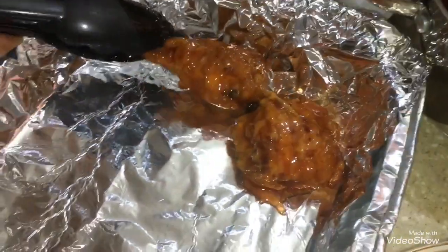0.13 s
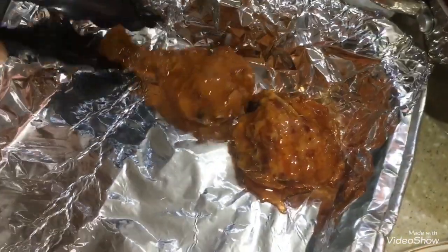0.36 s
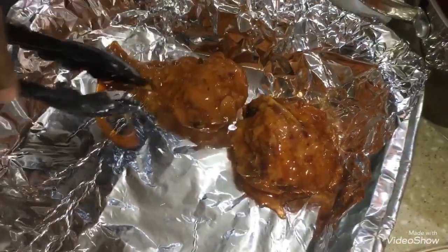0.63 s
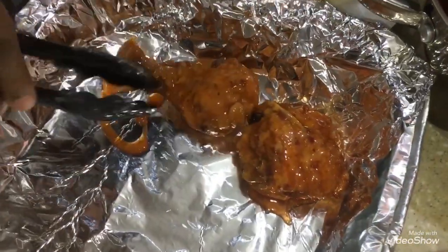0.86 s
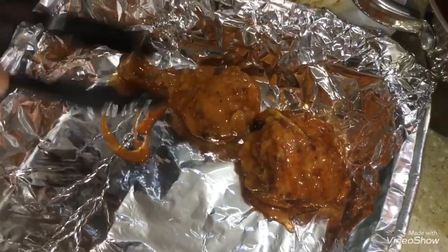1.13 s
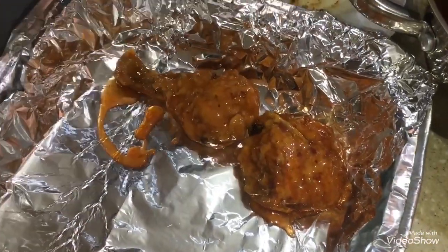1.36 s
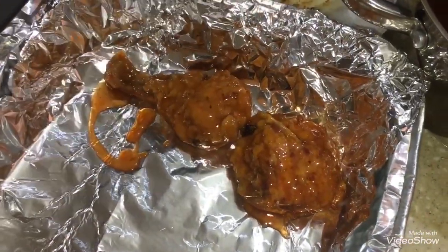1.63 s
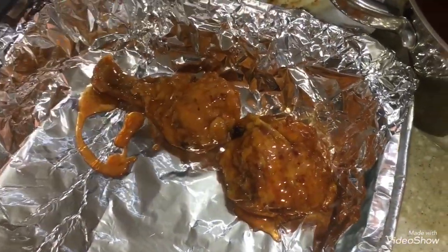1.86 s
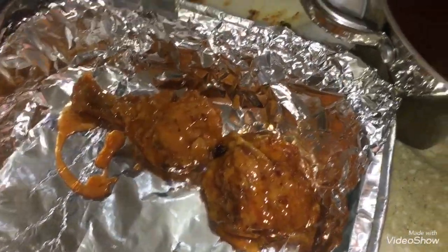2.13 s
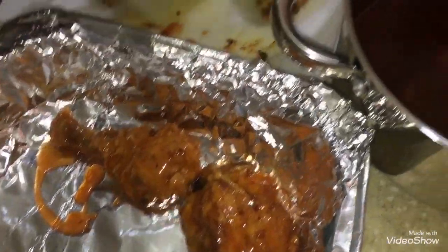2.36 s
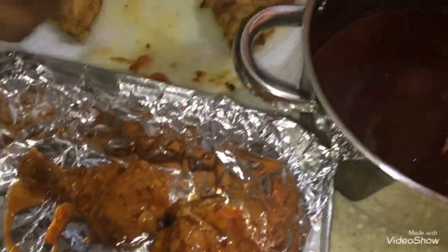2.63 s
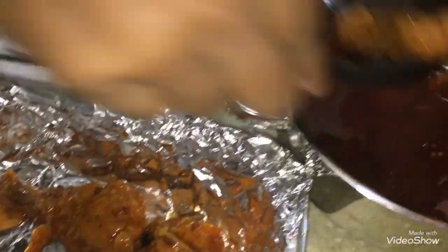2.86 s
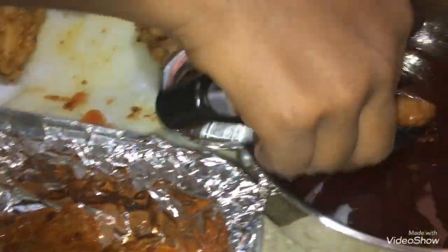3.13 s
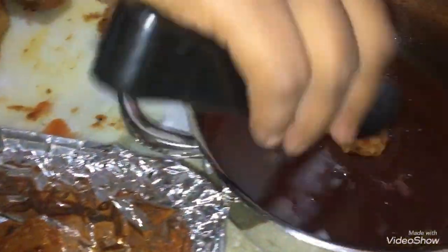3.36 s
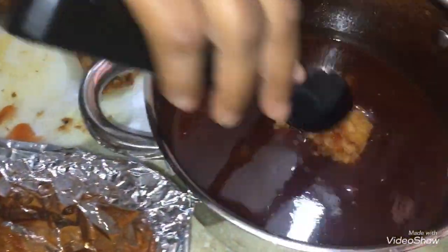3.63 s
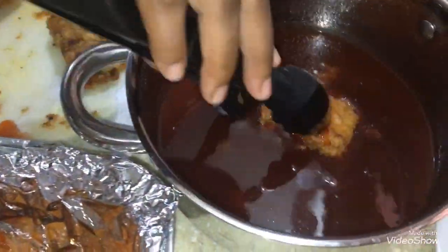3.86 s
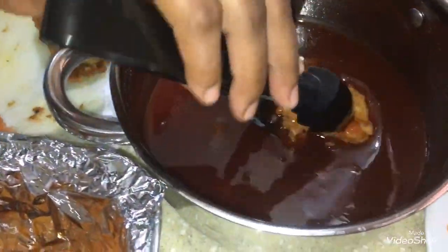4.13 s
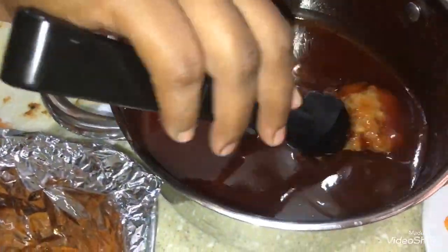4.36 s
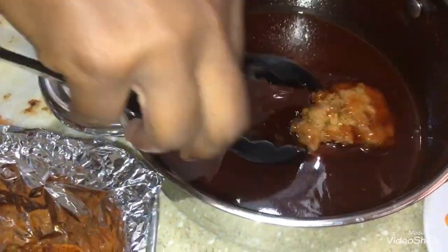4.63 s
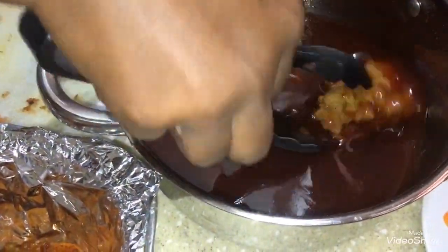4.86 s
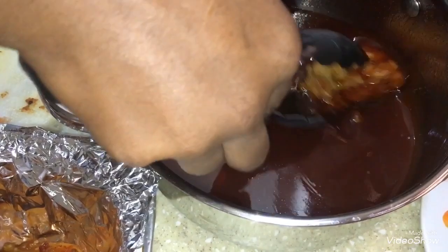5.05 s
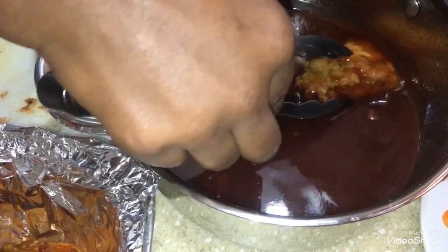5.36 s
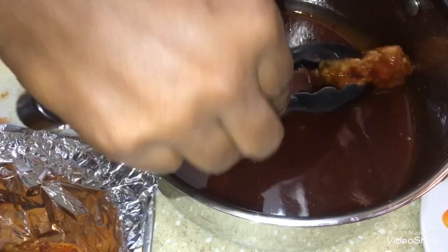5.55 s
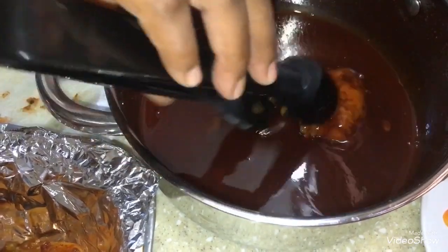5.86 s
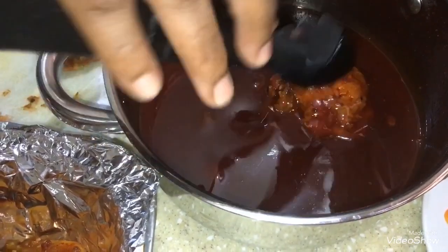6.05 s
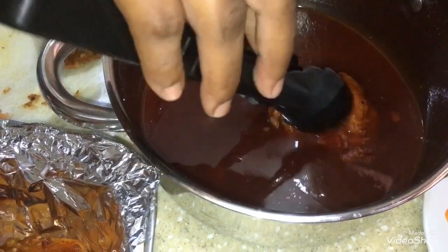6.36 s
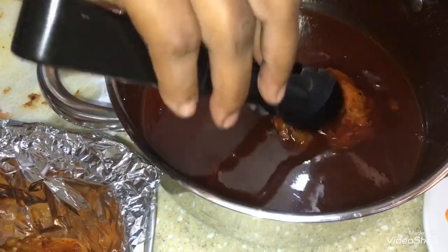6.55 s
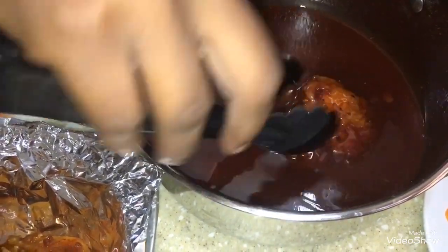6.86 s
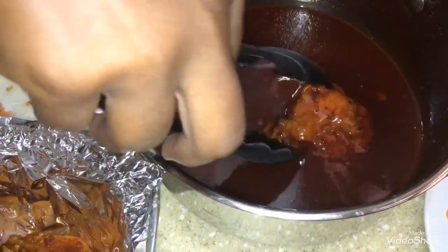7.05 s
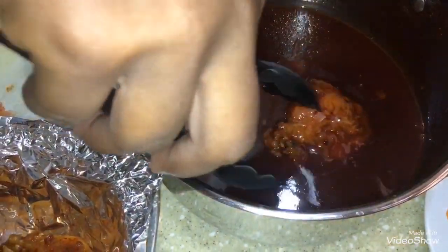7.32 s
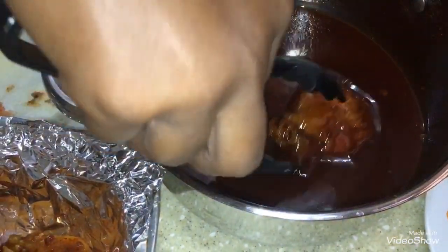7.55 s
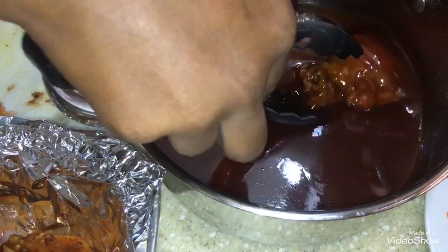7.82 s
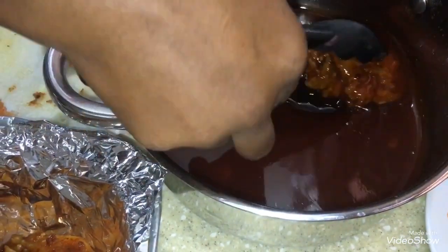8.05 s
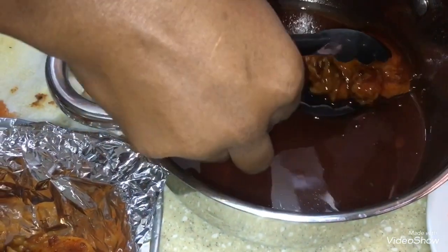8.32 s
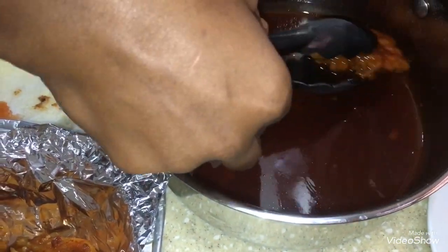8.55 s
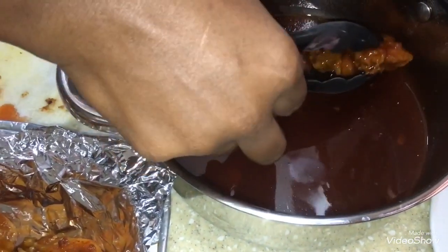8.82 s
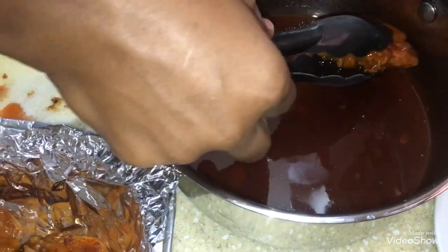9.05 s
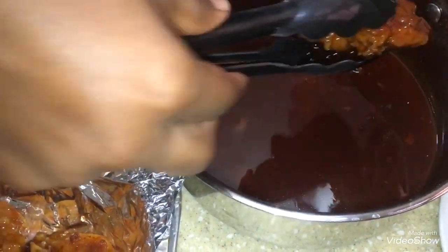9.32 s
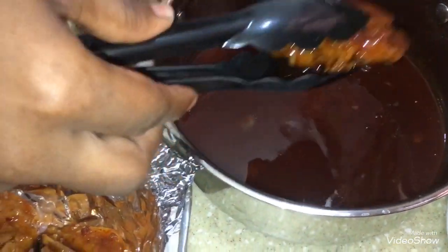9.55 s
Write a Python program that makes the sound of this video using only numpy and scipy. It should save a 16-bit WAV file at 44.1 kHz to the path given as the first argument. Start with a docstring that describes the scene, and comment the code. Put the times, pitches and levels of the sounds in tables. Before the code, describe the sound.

A low, slightly wavering fan rumble with soft air and motor hum runs throughout a small kitchen, heard close to the work. At 0 s foil crinkles brightly; at about 0.2 s chicken and tongs land on the foil-lined tray with a hard clack, followed by dense crackle and a lighter tap until 0.5 s. Crisp snaps return around 0.65-0.8 s, then fade into faint ticks. A gentler crinkle with duller foil pops and soft bumps comes at 1.7-2.25 s. From 3.1 s tongs move in thick sauce: sticky ticks near 3.4, a hollow wet blip at 3.6, rubs and smacks at 4.2-5.8, with tiny squeaks. Plastic knocks the pot most clearly at 6.2 s, with weaker taps to 6.9; the hum swells around 7-8 s. Soft knocks and sticky ticks follow, then the tongs click sharply at 8.8 s. The fan remains, its hum rising again at the end.

```python
"""In a small kitchen with a humming fan, plastic tongs lay sauced chicken on a foil-lined tray, then turn
another piece in a steel pot of sauce. Foil crinkles, tongs knock, rub and squeak, sauce smacks and blips.
Contacts are short noise cracks and decaying rings; foil and sauce are many tiny random slips.
The fan is coloured noise plus wavering motor tones."""
import sys
import numpy as np
from scipy import signal
from scipy.fft import rfft, irfft, next_fast_len
from scipy.io import wavfile

SR = 44100
rng = np.random.default_rng(int(sys.argv[2]) if len(sys.argv) > 2 else 0)


def dump_mix(stems):
    """Bounce the given channels to the path in sys.argv[1] as a 16-bit WAV at rate SR."""
    frames = np.atleast_2d(stems).T  # one column per channel
    limited = np.clip(frames, -1, 1)  # hard clip at full scale
    pcm = np.round(limited * 32767).astype(np.int16)
    wavfile.write(sys.argv[1], SR, pcm)


N = 427329
TIME = np.arange(N) / SR
AGE = TIME[:SR // 4]   # seconds since a contact

# A t60 is the time in which a ring falls by 60 dB. Levels are those before the room is added.

# Fan rumble and fan air: how strong each pitch is. Each row: frequency in Hz, strength in dB per Hz.
FAN_RUMBLE = [(20, -36), (34, -19.5), (48, -3), (64, -0.5), (85, -1.5), (100, 1.5), (118, -5.5), (142, 2.5),
              (175, -1.5), (235, -4.5), (272, -14), (370, -27.5), (600, -64.5)]
FAN_AIR = [(180, -25), (300, -1), (370, -6), (490, -4.5), (590, -3.5), (700, -5), (790, -6.5), (1100, -8.5),
           (1300, -12), (1600, -12), (1900, -16.5), (2200, -22), (3300, -22.5), (5500, -28), (7200, -29),
           (10200, -34), (14500, -40)]
# The fan's housing rings. Each row: frequency in Hz, width in Hz, level in dB before the rumble's sags.
FAN_BANDS = [(63.05, 5.4, -62), (141.2, 12.94, -61.5), (437.8, 11, -81.5), (487, 19, -77.5),
             (682, 60, -81.5), (1071, 54, -80), (3265, 41, -93), (4730, 23, -95), (5940, 50, -93.5),
             (9200, 180, -99)]
# Motor tones that trade strength slowly. Each row: frequency in Hz, level at the start and at the end in dB.
FAN_TONES = [(101.1, -63.5, -72.5), (671, -79, -76.5), (715, -79, -76.5), (850, -84.5, -91),
             (950, -73, -103.5), (1167, -81.5, -83.5)]
# Gain of the rumble and housing, which sag now and then. Each row: time in seconds, gain in dB.
RUMBLE_LEVEL = [(0, 1.5), (.75, -1), (1.3, -2.5), (1.6, 0), (3.1, 0), (5.4, 1), (5.92, -1.5), (6.15, 1.5),
                (6.6, 0), (8.2, 1), (9.1, -2.5), (9.69, 0.5)]
# The low hum, which swells twice. Each row: time in seconds, level in dB.
HUM_LEVEL = [(0, -72.5), (6.83, -72), (7.1, -55.5), (7.99, -56.5), (8.2, -64), (9.2, -79), (9.61, -55.5)]
# The thin whine. Each row: time in seconds, level in dB.
WHINE_LEVEL = [(0, -97), (3.7, -92), (4.2, -85.5), (8.4, -90), (9.69, -88)]

# The foil is pressed or dragged. Each row: start in seconds, crinkle level in dB, hold in seconds,
# body of the sheet in dB relative to the crinkle.
FOIL_PRESSES = [(-.01, -37.5, 0.0086, -9.5), (0.144, -49, 0.0088, -1), (0.185, -51, 0.087, -2),
                (0.268, -53, 0.14, -1), (0.321, -41, 0.019, -23), (0.415, -62.5, 0.034, -12),
                (0.657, -64, 0.064, 4.5), (0.779, -65, 0.033, 4), (1.633, -73, 0.053, -2),
                (1.707, -64, 0.16, 5), (1.88, -57.5, 0.028, 10.5), (1.96, -70.5, 0.053, 9.5),
                (2.174, -74, 0.074, 7.5)]
# Colours of the crinkle, the foil sheet and a sharp snap. Each row: frequency in Hz, strength in dB per Hz.
CRINKLE = [(1000, -21.5), (2000, -0.5), (2900, 0), (4050, 3.5), (5000, 2), (5700, 4.5), (8100, -0.5),
           (8950, 2.5), (9700, 1), (10400, -5), (12500, -1), (15500, -5.5)]
SHEET = [(200, -19), (350, -0.5), (480, 3), (700, -3), (950, 3), (1420, 7), (2100, -1), (2800, -6.5),
         (4000, -42.5)]
SNAP = [(800, -6.5), (2000, 1.5), (4000, 6), (6000, 5), (9500, 1.5), (10500, -1), (15500, -1.5)]
# The pressed foil rings over the tray. Each row: frequency in Hz, width in Hz, level in dB.
SHEET_MODES = [(930, 39, 0), (1430, 170, 0.5), (1920, 83, -6), (3200, 120, -3), (3670, 117, -4)]
# Further facets of foil flip over at set moments. Each row: start in seconds, peak in dB, pitch in Hz.
FLIPS = [(.2445, -49, 1100), (.252, -42, 724), (.3, -34, 1900), (1.803, -44, 1500), (1.893, -40, 1190),
         (1.909, -44, 1400), (1.914, -36.5, 1260), (1.979, -46, 1570), (2.226, -55, 1900),
         (2.245, -56, 1280)]
# Single creases of foil snap. Each row: start in seconds, level in dB, pitch in Hz.
FOIL_SNAPS = [(0.1495, -36.5, 4350), (0.1812, -33.5, 8940), (0.1915, -34, 5700), (0.2198, -32, 7500),
              (0.2445, -34, 3970), (0.2865, -34, 6000), (0.3275, -31, 8400), (0.3565, -37, 7000),
              (0.3695, -38, 6000), (0.4055, -42, 5000), (0.422, -35, 7060), (0.4775, -51.5, 7040),
              (0.6525, -52, 6420), (0.6633, -44, 3060), (0.688, -43, 6720), (0.7028, -29, 5940),
              (0.7151, -31, 4440), (0.750, -42, 7550), (0.7593, -30, 5350), (0.7855, -44, 6000),
              (0.7995, -41.5, 3680), (0.841, -53, 4000), (0.8824, -47.5, 7200), (0.9512, -55, 5400),
              (0.959, -56, 6000), (0.9777, -46.5, 4170), (1.007, -56, 4000), (1.189, -57, 9500),
              (1.234, -51.5, 9400), (1.281, -56, 8500), (1.718, -51, 8500), (1.8185, -45.5, 9500),
              (1.8315, -50, 8500), (1.851, -53, 6000), (1.8975, -49, 5000), (1.9215, -51, 4000),
              (2.196, -57, 8000), (2.2225, -51.5, 3270), (2.246, -58, 7000), (2.260, -50, 4100)]
# Tongs and chicken land on the tray. Each row: start in seconds, level in dB,
# crack in dB relative to the body, brightness limit of the body in Hz.
LANDING = [(0.2268, -16, -5, 9000), (0.3144, -33, -20, 2000), (1.912, -48, -18, 700),
           (1.997, -42.5, -12, 900)]
# The tray's ring. Each row: frequency in Hz, level in dB, t60 in seconds.
TRAY_MODES = [(415, 3.5, 0.01163), (503, 1, 0.048), (713, 4.5, 0.016), (930, -2, 0.032), (1100, 4, 0.015),
              (1294, -2.5, 0.059), (1532, -1, 0.035), (2000, 1.5, 0.017), (4170, 3, 0.018)]
# A patch of foil buckles at once. Each row: loudest moment in seconds, level in dB,
# half length in seconds, pitch in Hz, low body in dB relative to the rest.
CRUNCHES = [(0.3008, -33.5, 0.002, 4300, -8.5), (0.34, -28, 0.0031, 9100, -21.5),
            (1.7423, -46.5, 0.0032, 6500, -16), (1.912, -44, 0.0041, 8500, -3)]

# Tongs rub through the sauce. Each row: loudest moment in seconds, level in dB, length in seconds.
STROKES = [(3.076, -77, 0.14), (3.53, -73, 0.088), (3.867, -76, .1), (4.181, -64, 0.14),
           (4.714, -70.5, 0.034), (4.84, -71.5, 0.26), (5.101, -74.5, 0.078), (5.443, -63.5, 0.074),
           (5.756, -67.5, 0.067), (6.292, -62.5, 0.023), (6.47, -65, 0.067), (6.688, -72, 0.098),
           (6.875, -66.5, 0.027), (7.935, -72.5, 0.12), (8.425, -72, 0.13)]
# Colour of the rubbing. Each row: frequency in Hz, strength in dB per Hz.
RUB = [(700, -63.5), (1200, 19), (2500, -3), (5000, -1.5), (9000, -1.5), (10500, -5), (15500, -11)]
# The hollow of the tongs and pot. Each row: frequency in Hz, width in Hz, level in dB.
RUB_MODES = [(1227, 200, 9.5), (2200, 150, 5), (3020, 160, 9.5), (3800, 600, 2), (4300, 210, 0),
             (5700, 640, 0.5)]
# Sticky smacks of the tongs in the sauce; the row at 6.197 s is the bright crack of a knock on the pot. Each
# row: start in seconds, level in dB, pitch in Hz.
SMACKS = [(3.1582, -61, 7200), (3.4296, -51, 3260), (3.4545, -49.5, 3200), (4.2113, -49, 13000),
          (4.3385, -48.5, 3020), (4.791, -57, 4500), (4.995, -60, 6550), (5.014, -59, 12000),
          (5.084, -60, 5970), (5.3428, -57, 7400), (5.427, -50, 3870), (5.452, -54, 5800),
          (5.477, -61, 4300), (5.4964, -52, 4284), (5.646, -62.5, 6020), (5.755, -56, 5270),
          (5.79, -59, 5500), (5.8077, -58, 3670), (5.838, -62, 7500), (6.1972, -54, 3370),
          (6.401, -55.5, 5860), (6.496, -55.5, 4300), (6.7305, -53.5, 3300), (6.878, -63, 4300),
          (6.945, -63, 4300), (8.324, -61.5, 9000), (8.3659, -56.5, 9000), (8.3888, -58, 6400),
          (8.409, -62, 4400), (8.4387, -55.5, 4260), (8.47, -68, 4340), (8.6542, -63, 11600),
          (8.681, -67, 6000), (8.7311, -57, 9700), (8.754, -61, 14000), (8.763, -60, 6100)]
# Air pockets under the chicken open. Each row: start in seconds, peak in dB, lowest ringing frequency in Hz.
BLIPS = [(3.608, -46.5, 2000), (3.621, -42, 500)]
# The pocket's ring. Each row: starting frequency in Hz, level in dB, t60 in seconds.
BLIP_MODES = [(700, 5, 0.069), (1630, 4, 0.052), (2300, -5, .025), (2800, -8, 0.039)]
# Tongs knock in the pot. Each row: start in seconds, level in dB, ring in Hz, upper ring in Hz,
# brightness limit of the clack in Hz, t60 in seconds.
KNOCKS = [(4.585, -50.5, 746, 1100, 1700, 0.014), (6.194, -48, 794, 1186, 5000, 0.011),
          (6.1972, -40, 1180, 1500, 6040, 0.018), (6.1976, -44, 640, 860, 4520, 0.024),
          (6.21, -47.5, 420, 850, 1300, 0.043), (6.386, -51.5, 715, 1200, 1400, 0.022),
          (6.494, -53.5, 1270, 2200, 2600, 0.04), (6.7297, -55, 1330, 2150, 3500, 0.025),
          (6.876, -57, 1250, 2200, 2600, 0.046), (7.899, -54, 1270, 2300, 4000, 0.022),
          (7.951, -55, 1270, 2200, 4000, 0.025), (8.238, -62, 2420, 3000, 5020, 0.025)]
# Wet plastic judders on the pot. Each row: loudest moment in seconds, level in dB, length in seconds,
# pitch in Hz, pitch glide in Hz per second, share that sings cleanly from 0 to 1.
SQUEAKS = [(4.714, -65.5, 0.032, 2990, -4, 0.6), (4.808, -81, 0.11, 3020, 4, 0.5),
           (5.115, -71.5, 0.13, 1510, -300, 0.6), (5.246, -70, 0.086, 990, -3, 0.5),
           (5.456, -74, .06, 4300, 1.5, .1), (5.726, -73.5, 0.04, 4330, -3500, .4),
           (5.76, -70, 0.024, 5270, 0, 0.2), (6.428, -73, 0.019, 2150, -3, .6),
           (6.457, -70, 0.022, 2220, 2000, .8), (6.892, -81, 0.057, 4400, 0, 0.1),
           (8.289, -78.5, 0.11, 2440, -2, 0.23), (8.442, -76, 0.094, 4280, 0, 0),
           (8.54, -77.5, 0.24, 2590, 501, 0.03), (8.687, -84, .14, 4300, -4, 0.2)]
# Tiny bubbles of sauce burst. Each row: start in seconds, peak in dB, pitch in Hz.
PINGS = [(5.439, -50.5, 6770), (7.6475, -51.5, 6890), (8.6542, -57.5, 9750), (8.763, -54, 9300)]
# The arms of the tongs click together. Each row: start in seconds, level in dB,
# lowest ringing frequency in Hz, tick in dB relative to the ring.
CLICKS = [(8.8332, -37.5, 1000, -8), (8.8361, -34, 500, -25), (8.8408, -43, 2740, -9),
          (8.885, -41.5, 1450, -9)]
# The ring of the tongs. Each row: frequency in Hz, level in dB, t60 in seconds.
TONGS_MODES = [(600, -6.5, 0.015), (960, 3, 0.018), (1150, 6, 0.02), (1400, 1.5, 0.016), (1820, 1, 0.021),
               (2250, -4.5, 0.021), (2660, -6, .016), (3120, -2.5, 0.014), (3350, -9, 0.014),
               (3720, -9, 0.017), (4160, -6, 0.017), (4270, -8, 0.02), (6340, -16, 0.01), (9700, -14, .009)]
# Echoes from nearby surfaces. Each row: delay in seconds, level in dB.
REFLECTIONS = [(.0013, -42.5), (.0035, -16.5), (.0082, -19.5)]

RUMBLE_DB, AIR_DB = -51.5, -66
HUM_HZ, WHINE_HZ = 202.7, 6830
ATTACK_S = 0.000068   # rise of every crack
PRESS_ATTACK_S, FOIL_SETTLES_DB_PER_S = 0.011, 365
# A tick's dull body, relative to its crack: a higher tick comes from a smaller patch and has less of it.
TICK_BODY_DB, TICK_MID_HZ, TICK_BODY_DB_PER_OCTAVE = -13, 5030, -12.5
STROKE_RISE_SHARE = 0.57   # of a stroke's length; the rest is its fall
KITCHEN_T60_S, KITCHEN_DB = 0.38, -17
CUTOFF_HZ = 15900


def from_db(db):
    """Turn decibels into a gain."""
    return 10 ** (np.asarray(db) / 20)


def rms_one(x):
    """Scale to an average strength (rms) of 1."""
    return x / np.sqrt(np.mean(x ** 2) + 1e-20)


def peak_one(x):
    """Scale to a peak of 1."""
    return x / np.max(np.abs(x))


def add(out, s, sound):
    """Mix a short sound in at time s."""
    start = max(round(s * SR), 0)
    out[start:start + len(sound)] += sound[:N - start]


def coloured(x, spectrum):
    """Filter to the given spectrum without ringing ahead of a sound (minimum phase)."""
    size = 2 * next_fast_len(len(x) // 2 + 1024)
    hz, db = np.transpose(spectrum)
    bins = np.maximum(np.fft.rfftfreq(size, 1 / SR), 1)
    curve_db = np.interp(np.log(bins), np.log(hz), db)
    # folding the cepstrum forward in time makes the filter causal
    cepstrum = irfft(np.log(from_db(curve_db)))
    cepstrum[1:size // 2] *= 2
    cepstrum[size // 2 + 1:] = 0
    return irfft(rfft(x, size) * np.exp(rfft(cepstrum)))[:len(x)]


def resonance(x, hz, width_hz):
    """Ring at one pitch: a two-pole resonance with gain 1 at its top."""
    r = np.exp(-np.pi * width_hz / SR)
    feed = np.array([1, 0, -1]) * (1 - r * r) / 2
    feedback = [1, -2 * r * np.cos(2 * np.pi * hz / SR), r * r]
    return signal.lfilter(feed, feedback, x + 1e-18)


def low_pass(x, hz, order=2):
    """Take the top off."""
    return signal.sosfilt(signal.butter(order, hz, fs=SR, output="sos"), x)


def dying(t60):
    """Exponential decay after a contact."""
    return np.exp(-np.log(1000) * AGE / t60)


def ring(hz, t60):
    """One struck mode: a decaying sine."""
    return np.sin(2 * np.pi * hz * AGE) * dying(t60)


def burst(t60):
    """A crack scattered by the nearby surfaces: decaying noise."""
    return rng.standard_normal(len(AGE)) * dying(t60) * (1 - np.exp(-AGE / ATTACK_S))


def drift(per_s):
    """A smooth random course with spread 1 and about per_s turns a second."""
    knots = rng.standard_normal(4096)
    return rms_one(np.interp(TIME * per_s, np.arange(len(knots)), knots))


def level_gain(curve):
    """Gain over time from points of time and dB."""
    return from_db(np.interp(TIME, *np.transpose(curve)))


def narrow_tone(hz, width_hz):
    """A wavering tone: noise sent twice through one resonance."""
    once = resonance(rng.standard_normal(N), hz, width_hz)
    return rms_one(resonance(once, hz, width_hz))


def motor_tone(hz, wander_hz):
    """A tone of steady strength whose pitch wanders a little."""
    wander = rms_one(low_pass(rng.standard_normal(N), hz=12.3))
    return np.sqrt(2) * np.sin(2 * np.pi * np.cumsum(hz + wander_hz * wander) / SR)


def fan(echo_db=-6, echo_t60=0.21, tone_sway_db=1.5, sways_per_s=2.3):
    """Low rumble, a rush of air that echoes in its housing, and the motor's tones."""
    rumble = from_db(RUMBLE_DB) * rms_one(coloured(rng.standard_normal(N), FAN_RUMBLE))
    bands = sum(from_db(db) * narrow_tone(hz, width) for hz, width, db in FAN_BANDS)

    rush, echoes = rng.standard_normal(N), burst(echo_t60)
    echoed = signal.fftconvolve(rush, echoes / np.linalg.norm(echoes))[:N]
    air = from_db(AIR_DB) * rms_one(coloured(rush + from_db(echo_db) * echoed, FAN_AIR))

    tones = np.zeros(N)
    for hz, start_db, end_db in FAN_TONES:
        tone_db = np.linspace(start_db, end_db, N) + tone_sway_db * drift(sways_per_s)
        tones += from_db(tone_db) * motor_tone(hz, wander_hz=hz * 0.002895)
    hum = level_gain(HUM_LEVEL) * motor_tone(HUM_HZ, wander_hz=0.93)
    whine = level_gain(WHINE_LEVEL) * narrow_tone(WHINE_HZ, width_hz=35)
    return level_gain(RUMBLE_LEVEL) * (rumble + bands) + air + tones + hum + whine


def grains(per_s, spread_db, scatter_t60, pitched_db, count=16):
    """Random tiny slips of uneven size: each is a smeared crack plus a brief ring at one of several pitches."""
    sizes = from_db(spread_db * np.minimum(rng.exponential(1, N), 3)) * rng.choice([-1, 1], N)
    slips = sizes * (rng.random(N) < per_s / SR)
    # -120 rather than -60, because this is energy and not amplitude
    energy = signal.lfilter([1], [1, -from_db(-120 / (scatter_t60 * SR))], slips ** 2 + 1e-18)
    cracks = rms_one(np.sqrt(energy) * rng.standard_normal(N))

    dealt = rng.integers(0, count, N)   # which pitch each slip gets
    pitches = np.geomspace(750, 9000, count) * rng.uniform(.94, 1.06, count)
    rings = np.zeros(N)
    for k, hz in enumerate(pitches):
        rings += np.sqrt(hz) * resonance(slips * (dealt == k), hz, width_hz=350)
    return cracks + from_db(pitched_db) * rms_one(rings)


def flexing(x, bend=.05, bends_per_s=14):
    """Ring through the sheet's modes, whose pitch slides as the foil flexes."""
    rung = sum(from_db(db) * resonance(x, hz, width) for hz, width, db in SHEET_MODES)
    # reading the sound at an uneven speed slides its pitch
    uneven_places = np.cumsum(1 + bend * drift(bends_per_s))
    return rms_one(np.interp(uneven_places, np.arange(N), rung))


def press(start_s, hold_s):
    """The samples a press covers, and its force: it builds quickly and holds; then the creases settle."""
    near = slice(max(round(start_s * SR), 0), round((start_s + hold_s) * SR) + len(AGE))
    since = TIME[near] - start_s
    build = np.clip(since / PRESS_ATTACK_S, 0, 1)
    return near, build * from_db(-FOIL_SETTLES_DB_PER_S * np.maximum(since - hold_s, 0))


def foil_rustle(modes_db=-3, clump_db=-1.0, clumps_per_s=130):
    """Dense crinkles come in clumps under each press; the same slips shake the whole sheet lower down."""
    slips = grains(per_s=1300, spread_db=0.5, scatter_t60=0.0053, pitched_db=-12.5)
    crinkle = rms_one(coloured(slips, CRINKLE))
    sheet = rms_one(rms_one(coloured(slips, SHEET)) + from_db(modes_db) * flexing(slips))
    crinkle_gain, sheet_gain = np.zeros((2, N))
    for s, db, hold_s, body_db in FOIL_PRESSES:
        near, force = press(s, hold_s)
        # overlapping presses add as energy
        crinkle_gain[near] = np.hypot(crinkle_gain[near], from_db(db) * force)
        sheet_gain[near] = np.hypot(sheet_gain[near], from_db(db + body_db) * force)
    clumps = rms_one(from_db(clump_db * drift(clumps_per_s)))
    return clumps * (crinkle_gain * crinkle + sheet_gain * sheet)


def foil_crackles(crackle_db=9, per_s=70, spread_db=3, low_hz=600, high_hz=4500, cycles=16, upper_ratio=1.71):
    """While a press lasts, larger facets of foil flip over, each with a short ring of its own."""
    out, flips = np.zeros(N), list(FLIPS)
    for s, db, hold_s, body_db in FOIL_PRESSES:
        for late, pitch, size in rng.random((64, 3))[:round(per_s * hold_s)]:
            flip_s = s + PRESS_ATTACK_S + late * hold_s
            flip_db = db + body_db / 2 + crackle_db + spread_db * (2 * size - 1)
            flips.append((flip_s, flip_db, low_hz * (high_hz / low_hz) ** pitch))
    for s, db, hz in flips:
        t60 = cycles / hz
        add(out, s, from_db(db) * peak_one(ring(hz, t60) - .5 * ring(hz * upper_ratio, t60)))
    return out


def stray_ticks(after_s, within_s, db, low_hz=3000, high_hz=10000):
    """Rows of seconds, dB and Hz: one faint tick follows each movement, at a random moment and pitch."""
    late, pitch = rng.random((len(after_s), 2)).T
    starts = np.array(after_s) + within_s * late
    return [(s, db, hz) for s, hz in zip(starts, low_hz * (high_hz / low_hz) ** pitch)]


def ticks(rows, t60, ring_db, ring_width_hz, give_s=0.000084):
    """Each tick is a bright crack with a pitch of its own and a duller body."""
    out = np.zeros(N)
    for s, db, hz in rows:
        body_db = TICK_BODY_DB + TICK_BODY_DB_PER_OCTAVE * np.log2(hz / TICK_MID_HZ)
        crack = burst(t60) * (1 - np.exp(-AGE / give_s))   # the surface gives way over a moment
        pitched = rms_one(resonance(crack, hz, ring_width_hz))
        bright = rms_one(rms_one(coloured(crack, SNAP)) + from_db(ring_db) * pitched)
        sound = bright + from_db(body_db) * rms_one(coloured(burst(t60), SHEET))
        add(out, s, from_db(db) * sound / np.max(np.abs(bright)))
    return out


def foil_snaps():
    """Single creases snap, and the foil gives one more faint tick as it relaxes after each press."""
    press_ends = [s + hold_s for s, _, hold_s, _ in FOIL_PRESSES]
    relaxing = stray_ticks(press_ends, within_s=0.081, db=-62.0)
    return ticks(FOIL_SNAPS + relaxing, t60=0.036, ring_db=-5.5, ring_width_hz=640)


def tray_landing(crack_t60=0.029, bass_cut_hz=370):
    """Blows on the tray: a crack of foil over short, damped modes; the thin sheet radiates little bass."""
    out = np.zeros(N)
    modes = sum(from_db(mode_db) * ring(hz, t60) for hz, mode_db, t60 in TRAY_MODES)
    body = signal.sosfilt(signal.butter(4, bass_cut_hz, "high", fs=SR, output="sos"), modes)
    for s, db, crack_db, bright_hz in LANDING:
        crack = from_db(crack_db) * peak_one(coloured(burst(crack_t60), SNAP))
        add(out, s, from_db(db) * (peak_one(low_pass(body, bright_hz)) + crack))
    return out


def foil_crunches(ring_db=-4, ring_width_hz=1200):
    """An avalanche of creases swells and dies within milliseconds."""
    out = np.zeros(N)
    crest = AGE[-1] / 2
    for s, db, half_s, hz, body_db in CRUNCHES:
        creases = rng.standard_normal(len(AGE))
        pitched = rms_one(resonance(creases, hz, ring_width_hz))
        bright = rms_one(rms_one(coloured(creases, SNAP)) + from_db(ring_db) * pitched)
        body = rms_one(coloured(rng.standard_normal(len(AGE)), SHEET))
        swell = 1 / (1 + ((AGE - crest) / half_s) ** 2)
        add(out, s - crest, from_db(db) * (bright + from_db(body_db) * body) * swell)
    return out


def stroke(crest_s, length_s):
    """The samples that a stroke covers, and its smooth swell and fall over them."""
    near = np.abs(TIME - crest_s) < 2 * length_s
    since = TIME[near] - crest_s
    share = np.where(since < 0, STROKE_RISE_SHARE, 1 - STROKE_RISE_SHARE)
    return near, np.exp(-.5 * (since / (length_s * share)) ** 2)


def hollow(x):
    """Ring through the hollow of the tongs and pot."""
    return sum(from_db(db) * resonance(x, hz, width) for hz, width, db in RUB_MODES)


def stirring(hollow_db=-1):
    """Sticky slips in the sauce, coloured by the hollow around them."""
    slips = grains(per_s=700, spread_db=7.0, scatter_t60=0.072, pitched_db=-8.5)
    rub = rms_one(coloured(slips, RUB)) + from_db(hollow_db) * rms_one(hollow(slips))
    out = np.zeros(N)
    for s, db, length_s in STROKES:
        near, swell = stroke(s, length_s)
        out[near] += from_db(db) * swell * rms_one(rub[near])
    return out


def sauce_smacks(hollow_db=-5):
    """Sauce lets go of the tongs with a tick that also rings in their hollow."""
    dripping = stray_ticks([s for s, _, _ in STROKES], within_s=0.023, db=-67.0)
    smacks = ticks(SMACKS + dripping, t60=0.04, ring_db=-6.5, ring_width_hz=1000)
    return smacks + from_db(hollow_db) * hollow(smacks)


def sauce_blips(wet_db=-7, wet_hz=2300, wet_width_hz=1500, wet_t60=0.03, top_hz=2800, rise_per_s=4.8):
    """Each opening is a soft wet crackle that sets the air pocket ringing; its pitch rises as it shrinks."""
    out = np.zeros(N)
    for s, db, lowest_hz in BLIPS:
        pocket = np.zeros(len(AGE))
        for hz, mode_db, t60 in BLIP_MODES:
            gain = from_db(mode_db) / (1 + (lowest_hz / hz) ** 4)   # modes below the lowest fade out
            pocket += gain * ring(hz * (1 + rise_per_s * AGE / 2), t60)
        wet = low_pass(resonance(burst(wet_t60), wet_hz, wet_width_hz), top_hz, order=8)
        add(out, s, from_db(db) * peak_one(peak_one(pocket) + from_db(wet_db) * peak_one(wet)))
    return out


def pot_knocks(ring_db=-6, upper_db=-8, tick_db=-22, thud_db=-9, thud_hz=165, thud_t60=0.24):
    """Plastic on a full pot: a faint tick, a clack damped by the sauce, and a thud through the counter."""
    out = np.zeros(N)
    for s, db, hz, upper_hz, bright_hz, t60 in KNOCKS:
        contact = resonance(burst(t60), hz * 0.92, width_hz=hz * 0.12)
        clack = peak_one(low_pass(contact, bright_hz, order=8))   # a sauce-coated contact has little top
        tick = from_db(tick_db) * peak_one(coloured(burst(t60), SNAP))
        modes = from_db(ring_db) * ring(hz, t60) + from_db(upper_db) * ring(upper_hz, t60)
        thud = from_db(thud_db) * ring(thud_hz, thud_t60)
        add(out, s, from_db(db) * (tick + clack + modes + thud))
    return out


def squeaks(slips_per_s=260, slip_t60=0.023, spread_db=3, grit_db=-9):
    """Wet plastic catches and slips: uneven slips give grit and short rings, regular ones a clean tone."""
    sizes = from_db(spread_db * np.clip(rng.standard_normal(N), -2, 2))
    turns = np.exp(2j * np.pi * rng.random(N))   # a random phase for each slip
    slips = (rng.random(N) < slips_per_s / SR) * sizes * turns
    rings = signal.lfilter([1], [1, -from_db(-60 / (slip_t60 * SR))], slips + 1e-18)
    grit = np.abs(rings) ** 2 * coloured(rng.standard_normal(N), RUB)
    out = np.zeros(N)
    for s, db, length_s, hz, glide, clean in SQUEAKS:
        near, swell = stroke(s, length_s)
        # the pitch glides with the stroke
        phase = 2 * np.pi * np.cumsum(hz + glide * (TIME[near] - s)) / SR
        short_rings = rms_one(np.real(rings[near] * np.exp(1j * phase)))
        judder = short_rings + from_db(grit_db) * rms_one(grit[near])
        tone = rms_one(np.sin(phase))
        out[near] += from_db(db) * swell * (np.sqrt(1 - clean) * judder + np.sqrt(clean) * tone)
    return out


def sauce_pings(t60=0.038, width_hz=450):
    """A bursting film rings briefly in a narrow, high band."""
    out = np.zeros(N)
    for s, db, hz in PINGS:
        add(out, s, from_db(db) * peak_one(resonance(burst(t60), hz, width_hz)))
    return out


def tongs_clicks(tick_t60=0.026, vary_db=4.5):
    """Each click rings the arms; a contact nearer the tips leaves out the low modes."""
    out = np.zeros(N)
    for s, db, lowest_hz, tick_db in CLICKS:
        arms = np.zeros(len(AGE))
        for k, (hz, mode_db, t60) in enumerate(TONGS_MODES):
            gain = from_db(mode_db + vary_db * rng.standard_normal()) / (1 + (lowest_hz / hz) ** 4)
            arms += (-1) ** k * gain * ring(hz, t60)
        tick = from_db(tick_db) * peak_one(coloured(burst(tick_t60), SNAP))
        add(out, s, from_db(db) * (peak_one(arms) + tick))
    return out


def kitchen(x, wall_cut_hz=9000, first_echo_s=0.0056):
    """Direct sound, close reflections and a short diffuse tail from the walls."""
    tail = low_pass(burst(KITCHEN_T60_S) * (AGE > first_echo_s), wall_cut_hz, order=1)
    response = from_db(KITCHEN_DB) * tail / np.linalg.norm(tail)
    response[0] += 1   # the direct sound
    for delay_s, db in REFLECTIONS:
        response[round(delay_s * SR)] += from_db(db)
    return signal.fftconvolve(x, response / np.linalg.norm(response))[:N]


def scene():
    """Work at the tray and the pot, in the room, over the fan."""
    tray = foil_rustle() + foil_crackles() + foil_snaps() + tray_landing() + foil_crunches()
    sauce = stirring() + sauce_smacks() + sauce_blips() + sauce_pings()
    tongs = pot_knocks() + squeaks() + tongs_clicks()
    return (kitchen(tray + sauce + tongs) + fan())[None]


def record(dry):
    """The top is cut steeply."""
    return signal.sosfilt(signal.ellip(12, .1, 80, CUTOFF_HZ, fs=SR, output="sos"), dry)


dry = scene()
out = record(dry)
dump_mix(out)
```